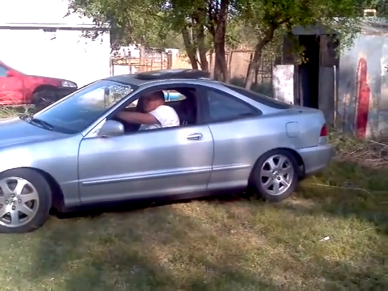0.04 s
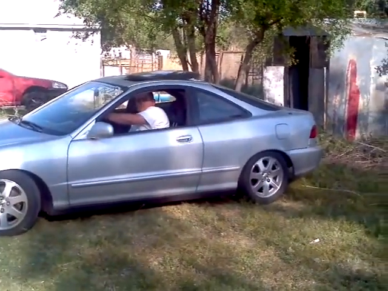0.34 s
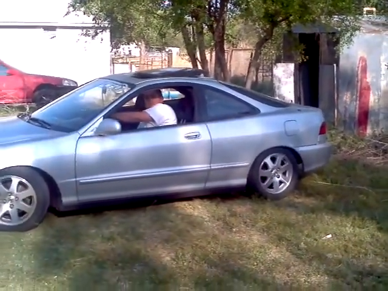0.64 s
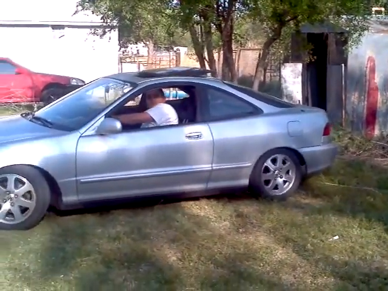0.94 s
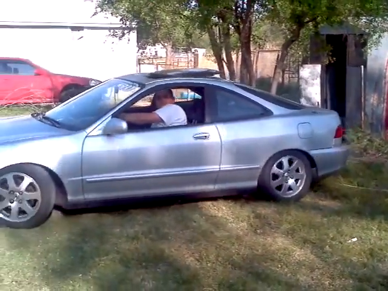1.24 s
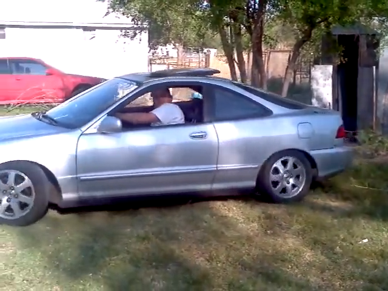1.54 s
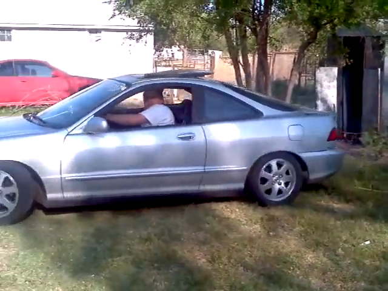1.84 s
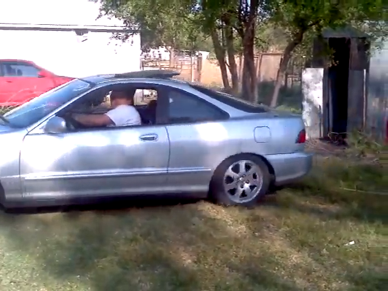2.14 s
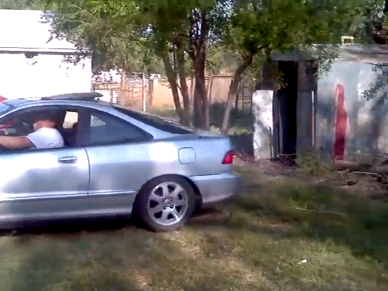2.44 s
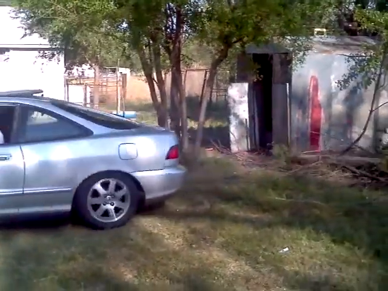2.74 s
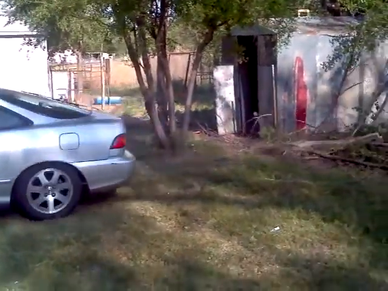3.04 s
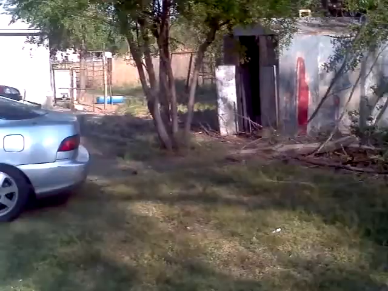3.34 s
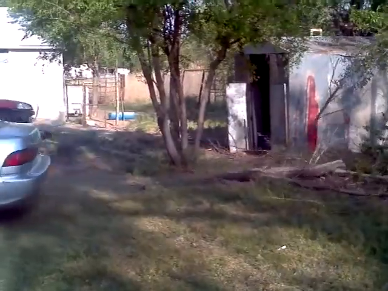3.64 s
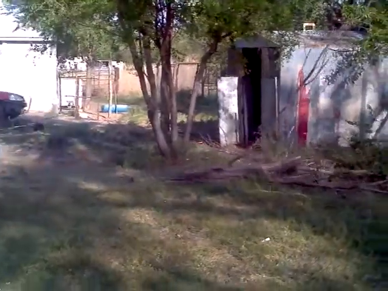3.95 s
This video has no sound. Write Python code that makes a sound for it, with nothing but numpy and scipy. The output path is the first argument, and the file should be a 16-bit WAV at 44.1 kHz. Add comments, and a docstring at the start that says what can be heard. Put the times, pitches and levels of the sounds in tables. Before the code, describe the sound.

A car engine drops from a rev to idle as tyres crunch over dry grass.

```python
"""A car rolling over dry grass.

A four-cylinder engine sinks from a rev to a lumpy idle: its exhaust booms while the firings come fast,
then throbs as each one rings the pipe. The engine bay whirrs and a belt sings faintly. The tyres crunch
dry grass and snap twigs, each fracture a small impulse, as they pass a stereo microphone in a yard."""
import sys
import numpy as np
from scipy import signal
from scipy.fft import rfft, irfft
from scipy.io import wavfile

SR = 44100
rng = np.random.default_rng(int(sys.argv[2]) if len(sys.argv) > 2 else 0)


def unload_audio(sound):
    """Save the sound as a 16-bit wav file, at the path given as the first command line argument."""
    columns = np.transpose(np.atleast_2d(sound))
    # keep every value between -1 and 1, then stretch to whole-number steps
    steps = np.round(np.clip(columns, -1, 1) * 32767)
    wavfile.write(sys.argv[1], SR, steps.astype(np.int16))


N = 176400
T = np.arange(N) / SR
FFT_SIZE = 2 ** 18
HZ = np.maximum(np.arange(FFT_SIZE // 2 + 1) * SR / FFT_SIZE, 1)
SNAP_DECAY_S = .002

# Rate of the exhaust beats heard; near 3.43 s the rhythm skips with one quick double beat.
# Each row: time in seconds, beats per second.
BEAT_RATE = [(0.12, 148.2), (0.25, 142.7), (0.5, 126.3), (0.72, 112.3), (1.02, 94.3), (1.39, 70.8),
             (1.6, 59.5), (1.8, 48.5), (2.03, 37.5), (2.25, 31.4), (2.76, 21.3), (2.92, 22.3), (3.15, 25.5),
             (3.39, 26.6), (3.43, 37.7), (3.48, 27.3), (3.57, 28.4), (3.8, 27.2), (4.0, 28.4)]
# The exhaust's boom at high revs, with its stumbles. Each row: time in seconds, level in dB.
BOOM_LEVEL = [(.025, -34), (.06, -47), (.125, -27.5), (.157, -47), (.185, -31), (.33, -29), (.53, -28.5),
              (.57, -35.5), (.6, -30.5), (.66, -40), (.79, -33.5), (.88, -42.5), (1.1, -46), (1.7, -88)]


def from_db(db):
    """Amplitude grows tenfold for every 20 dB."""
    return 10 ** (np.asarray(db) / 20)


def unit_power(x):
    """Division by the root mean square gives unit power."""
    return x / np.sqrt(np.mean(x ** 2) + 1e-20)


def in_time(rows):
    """Linear interpolation gives a control curve its value at every sample."""
    return np.interp(T, *np.transpose(rows))


def envelope(levels):
    """A level that moves linearly in dB is an exponential rise or fall of amplitude."""
    return from_db(in_time(levels))


def gain_at(spectrum):
    """A magnitude response, interpolated in dB over log frequency."""
    hz, db = np.transpose(spectrum)
    return from_db(np.interp(np.log(HZ), np.log(hz), db))


def colour(x, spectrum):
    """Minimum-phase filtering: folding the cepstrum makes the response causal. Unit power."""
    cepstrum = irfft(np.log(gain_at(spectrum)))
    cepstrum[1:FFT_SIZE // 2] *= 2
    cepstrum[FFT_SIZE // 2 + 1:] = 0
    response = np.exp(rfft(cepstrum))
    return unit_power(irfft(rfft(x, FFT_SIZE) * response)[:N])


def resonate(x, hz, width_hz):
    """Two equal damped resonators in cascade pass a narrow band. Unit power."""
    r = np.exp(-np.pi * width_hz / SR)
    section = [1 - r, 0, r - 1, 1, -2 * r * np.cos(2 * np.pi * hz / SR), r * r]
    return unit_power(signal.sosfilt([section, section], x))


def low_cut(x, hz):
    """A second-order high-pass falls 12 dB per octave below its corner."""
    return signal.sosfilt(signal.butter(2, hz, "high", fs=SR, output="sos"), x)


def noise():
    """Independent Gaussian samples have a white spectrum."""
    return rng.standard_normal(N)


def pulsed_noise(beats, depth=.12):
    """Amplitude modulation makes noise throb once per beat."""
    return noise() * (1 + depth * np.cos(2 * np.pi * beats))


def drift(per_s):
    """Interpolating between random values gives a slow fluctuation of unit power."""
    return unit_power(np.interp(T * per_s, np.arange(N), noise()))


def dying(start, decay_s):
    """A sudden onset dies away exponentially, as a damped vibration does."""
    return (T >= start) * np.exp(-np.maximum(T - start, 0) / decay_s)


def grains(per_s, spread_db=3):
    """Shot noise: clicks at random instants, mostly small, a few large. Unit power."""
    sizes = from_db(spread_db * np.minimum(rng.exponential(1, N), 5)) * rng.choice([-1, 1], N)
    return unit_power(sizes * (rng.random(N) < per_s / SR))


def glides(rows, waver=.0054):
    """Frequency modulation: tones slide and waver under a half-sine envelope."""
    out = 0
    for start, length, start_hz, end_hz, db in rows:
        along = np.clip((T - start) / length, 0, 1)
        hz = (start_hz + (end_hz - start_hz) * along) * (1 + waver * drift(150))
        phase = 2 * np.pi * np.cumsum(hz * (T >= start)) / SR
        out = out + from_db(db) * np.sin(np.pi * along) * np.sin(phase)
    return out


def yard(x):
    """Scattering from ground, car and sheds gives each side its own weak tail, with little bass."""
    tails = rng.standard_normal((2, N)) * dying(.0038, decay_s=.011)
    tails /= np.sqrt(np.sum(tails ** 2, axis=1, keepdims=True))
    return from_db(-40) * signal.fftconvolve(low_cut(x, hz=300)[None], tails, axes=1)[:, :N]


def chirps():
    """Narrow-band noise has a pitch; brief decays of it are heard as faint, far chirps."""
    # The chirps. Each row: start in seconds, level in dB.
    onsets = [(0.221, -52.5), (0.734, -55.5)]
    band = resonate(noise(), hz=3780, width_hz=440)
    return band * sum(from_db(db) * dying(start, decay_s=.025) for start, db in onsets)


def bumps():
    """A low tone that lasts only a moment is heard as a bump."""
    # The bumps. Each row: start and length in seconds, first and last pitch in Hz, level in dB.
    tones = [(3.413, .02, 30, 30, -40), (3.653, 0.035, 245, 260, -30)]
    return glides(tones)


def grass():
    """Brittle fracture under the tyres: clumps of clicks, rustle, ringing stalks and ticking twiglets."""
    # Strength of the crunch. Each row: time in seconds, level in dB.
    levels = [(1.3, -71.5), (1.45, -61), (1.75, -55.5), (2.15, -52), (2.3, -48), (2.65, -45.5), (3.1, -40),
              (3.35, -40.5), (3.46, -34.5), (3.63, -43), (3.75, -40.5), (4, -39.5)]
    # Its spectrum. Each row: frequency in Hz, gain in dB.
    spectrum = [(150, -36), (1500, -2), (2200, -5.5), (3600, 4), (4500, -1.5), (7500, 2.5), (8800, 8.5),
                (11000, -2), (16000, -1.5)]
    stalk_hz = np.linspace(2000, 14030, 20)
    stalks = unit_power(sum(resonate(grains(per_s=45) + 1e-18, hz, width_hz=360) for hz in stalk_hz))
    crunch = grains(per_s=1100) + from_db(2) * noise() + from_db(-2.5) * stalks
    tick_envelope = signal.fftconvolve(np.abs(grains(per_s=70)), dying(0, SNAP_DECAY_S))[:N]
    ticks = unit_power(tick_envelope * noise())
    clumps = from_db(1.5 * drift(per_s=70))
    return colour(crunch * clumps + from_db(-2) * ticks, spectrum) * envelope(levels)


def soil():
    """Soil and stalks crushed under the tread give dense impulses that merge into a duller grinding."""
    # Strength of the grinding. Each row: time in seconds, level in dB.
    levels = [(0, -81), (2.15, -59.5), (2.3, -48), (2.55, -52.5), (2.68, -44), (2.87, -48), (3.15, -48),
              (3.67, -46), (4, -50.5)]
    # Its spectrum. Each row: frequency in Hz, gain in dB.
    spectrum = [(60, -51), (600, 5.5), (800, 2), (1200, 3), (1500, -8), (2100, 4.5), (3000, -18.5),
                (6000, -7)]
    grinding = grains(per_s=1100) * from_db(1.5 * drift(per_s=43))
    return colour(grinding, spectrum) * envelope(levels)


def twigs():
    """Sudden fracture gives a broadband crack, a woody resonance and a short tail of splinters."""
    # Breaking twigs. Each row: start in seconds, relative level in dB, resonance in Hz.
    snaps = [(1.381, -37.5, 3460), (1.471, -41.5, 7200), (1.693, -30, 4430), (1.777, -38.5, 5000),
             (1.829, -28.5, 4700), (1.971, -34, 4000), (2.092, -30.5, 2010), (2.254, -29.5, 3400),
             (2.262, -27, 3170), (2.319, -24.5, 2220), (2.39, -26.5, 3300), (2.517, -21, 3470),
             (2.543, -30, 7630), (2.661, -13, 3370), (2.667, -19, 2000), (2.673, -41, 7900),
             (2.923, -15.5, 2210), (3.0639, -12, 4440), (3.082, -12, 3800), (3.096, -20.5, 4750),
             (3.195, -23, 6460), (3.410, -13.5, 6370), (3.442, -20.5, 9700), (3.301, -20.5, 2140),
             (3.509, -24, 3750), (3.666, -28.5, 2520), (3.757, -23, 7100), (3.765, -13, 7730)]
    # Spectrum of cracks and splinters. Each row: frequency in Hz, gain in dB.
    spectrum = [(80, -68), (400, -23), (1500, -15), (3000, -2.5), (6000, -6.5), (7800, 1.5), (10000, -4),
                (16000, -13)]
    crack, fibres = colour(noise(), spectrum), noise()
    splinters = from_db(-14) * colour(grains(per_s=770), spectrum)
    out = 0
    for start, db, hz in snaps:
        ring = from_db(-7.5) * resonate(fibres, hz, width_hz=660)
        burst = unit_power(crack + ring) * dying(start, SNAP_DECAY_S)
        tail = splinters * dying(start, decay_s=.021)
        out = out + .5 * from_db(db) * (burst + tail)
    return out


def engine_bay(beats, pulley_order=5.88):
    """Rotating parts give a throbbing whirr and a pulley tone tied to the beat rate; the intake hisses."""
    # Strength of the whirr and of the hiss. Each row: time in seconds, level in dB.
    whirr_levels = [(0, -46.5), (.45, -48), (.8, -51), (1.2, -54.5), (2, -56), (4, -47.5)]
    hiss_levels = [(.3, -59), (.75, -62.5), (1.1, -67), (2, -82)]
    # Their spectra. Each row: frequency in Hz, gain in dB.
    whirr_spectrum = [(60, -14.5), (450, 5), (620, 0.5), (1050, 1), (1300, -4), (1550, -14), (2000, -8.5),
                      (2600, -12), (4300, -18.5), (16000, -28)]
    hiss_spectrum = [(4000, -30), (6500, -20), (7300, -4.5), (8300, -6.5), (13000, -29)]
    whirr = colour(pulsed_noise(beats), whirr_spectrum) * envelope(whirr_levels)
    whine = from_db(-24.5) * envelope(BOOM_LEVEL) * np.sin(2 * np.pi * pulley_order * beats)
    hiss = colour(noise(), hiss_spectrum) * envelope(hiss_levels)
    return whirr + whine + hiss


def belt():
    """A vibrating belt radiates thin, gliding tones."""
    # Its notes. Each row: start and length in seconds, first and last pitch in Hz, level in dB.
    tones = [(1.19, 0.15, 7600, 8250, -65), (1.28, 0.14, 6450, 6330, -63), (1.39, 0.27, 6120, 6360, -59.5),
             (2.11, 0.37, 6360, 6530, -56)]
    return glides(tones)


def exhaust_pops():
    """Each dull pop is an impulse response of the exhaust."""
    # The pops. Each row: start in seconds, peak level in dB.
    onsets = [(0.267, -24), (0.539, -25), (0.556, -30)]
    # Spectrum of one pop. Each row: frequency in Hz, gain in dB.
    spectrum = [(50, -31), (150, -7.5), (250, -6), (330, -13), (450, -10), (1200, -70)]
    pop = colour(1. * (T == 0), spectrum)
    pop /= np.abs(pop).max()
    return -sum(from_db(db) * np.interp(T - start, T, pop, left=0) for start, db in onsets)


def exhaust_gas(beats):
    """Turbulent flow in the pipe makes a low noise that pulses with the beats."""
    # Strength of the flow noise. Each row: time in seconds, level in dB.
    levels = [(.42, -51), (.6, -50), (1.1, -49), (3.3, -55), (3.7, -42), (4, -49)]
    # Its spectrum. Each row: frequency in Hz, gain in dB.
    spectrum = [(50, -47.5), (120, 1), (270, 3.5), (430, -4.5), (580, -11.5), (2000, -67)]
    return colour(pulsed_noise(beats), spectrum) * envelope(levels)


def exhaust_drone(beats, order=7):
    """A single harmonic of the beat rate sets in as a low drone at idle."""
    # Onset of the drone. Each row: time in seconds, RMS level in dB.
    levels = [(3.38, -70), (3.5, -46)]
    return np.sqrt(2) * np.sin(2 * np.pi * order * beats) * envelope(levels)


def exhaust_boom(beats):
    """Periodic firing gives a harmonic series; unequal cylinders add weaker half orders."""
    # Spectral envelopes of both series. Each row: multiple of the beat rate, relative level in dB.
    whole_orders = [(1, 1.5), (2, -11.5), (3, -12), (4, -29), (10, -34)]
    half_orders = [(3.5, -24.5), (5, -46)]
    partials = 0
    for orders, levels in (np.arange(1, 11), whole_orders), (np.arange(1.5, 10), half_orders):
        for order in orders:
            db = np.interp(order, *np.transpose(levels))
            partials = partials + from_db(db) * np.cos(2 * np.pi * order * beats)
    return -unit_power(partials) * envelope(BOOM_LEVEL)


def exhaust_beats(beats, spread_db=.7):
    """Each beat is a slightly uneven impulse that excites the resonances of the pipe."""
    # Strength of the beats. Each row: time in seconds, level in dB.
    levels = [(.9, -65), (1.35, -41.5), (1.6, -51.5), (2, -41.5), (2.9, -44.5), (3.1, -40), (3.7, -40.5),
              (4, -42)]
    # Response of the pipe. Each row: frequency in Hz, gain in dB.
    pipe = [(40, -36), (62, -15.5), (85, 3), (118, 13), (150, 5), (190, 4.5), (215, -2.5), (240, 4.5),
            (285, -11), (330, -5), (430, -26), (1400, -40)]
    instants = np.flatnonzero(np.diff(np.floor(beats)))
    strengths = from_db(spread_db * noise()[:len(instants)])
    pulses = np.zeros(N)
    pulses[instants] = -strengths / np.sqrt(in_time(BEAT_RATE)[instants])  # equal power at any rate
    return colour(low_cut(pulses, hz=58), pipe) * envelope(levels)


def scene():
    """Superposition: the sources add, and the yard's scatter joins them on two channels."""
    beats = np.cumsum(in_time(BEAT_RATE)) / SR  # phase, one cycle per exhaust beat
    exhaust = exhaust_beats(beats) + exhaust_boom(beats) + exhaust_gas(beats)
    exhaust += exhaust_drone(beats) + exhaust_pops()
    direct = exhaust + engine_bay(beats) + belt() + grass() + soil() + twigs() + bumps() + chirps()
    return direct + yard(direct)


def record(dry, right_delay_s=15 / SR, cutoff_hz=15900):
    """Phase differences widen the image: the right side lags, its treble inverted. The top is cut."""
    # The microphone's right side against its left. Each row: frequency in Hz, gain in dB.
    right_gain = [(1100, -5), (1500, -.5), (2400, 3), (3000, 0), (5000, .5)]
    # Its phase lag on top of the delay. Each row: frequency in Hz, lag in radians.
    right_lag = [(100, -1.1), (460, -.4), (680, 3.5), (860, 4.1), (2200, 2.5), (2700, 3.14)]
    lag = 2 * np.pi * HZ * right_delay_s + np.interp(HZ, *np.transpose(right_lag))
    right = irfft(rfft(dry[1], FFT_SIZE) * gain_at(right_gain) * np.exp(-1j * lag))[:N]
    low_pass = signal.ellip(12, .1, 80, cutoff_hz, fs=SR, output="sos")
    return signal.sosfilt(low_pass, [dry[0], right])


dry = scene()
out = record(dry)
unload_audio(out)
```